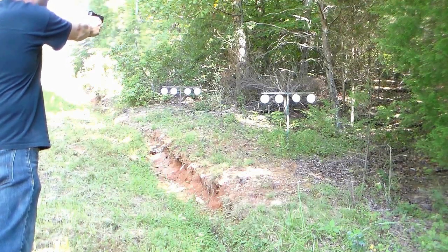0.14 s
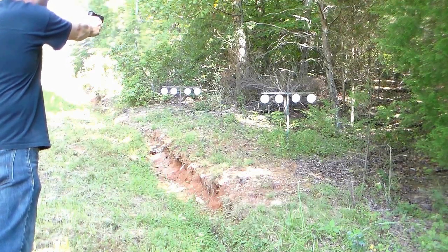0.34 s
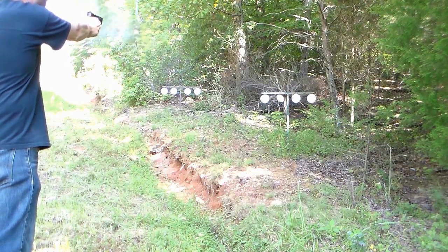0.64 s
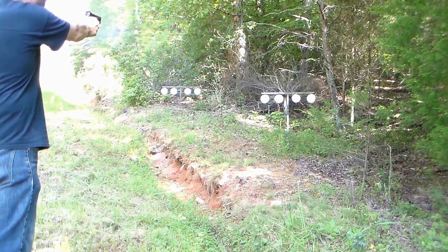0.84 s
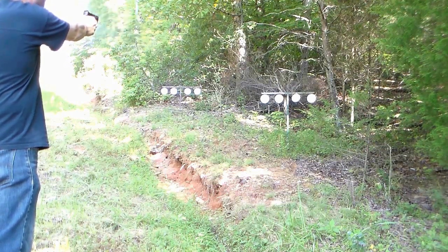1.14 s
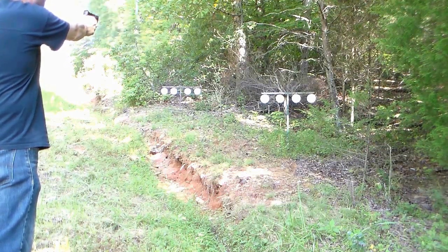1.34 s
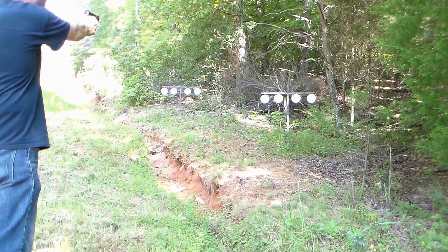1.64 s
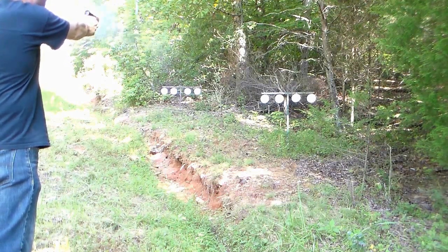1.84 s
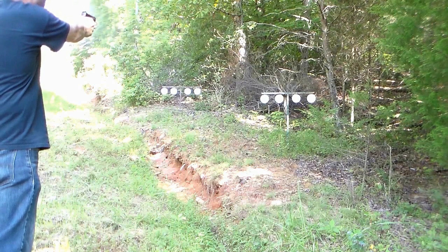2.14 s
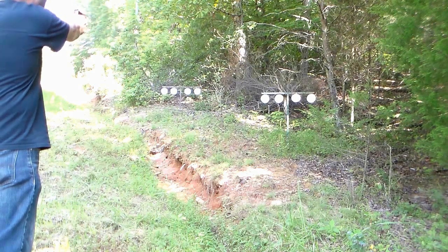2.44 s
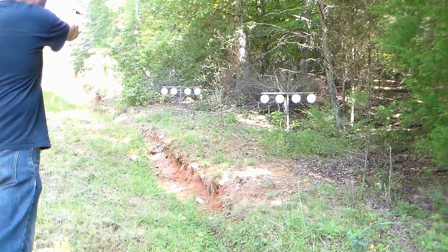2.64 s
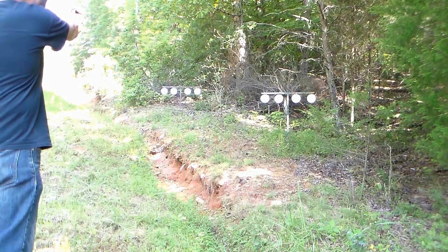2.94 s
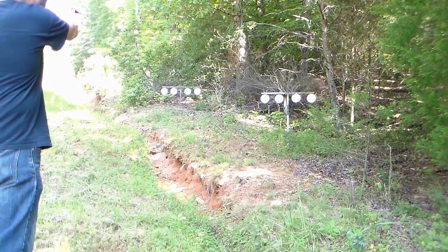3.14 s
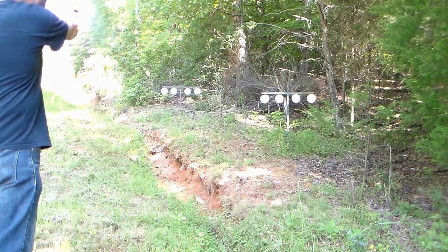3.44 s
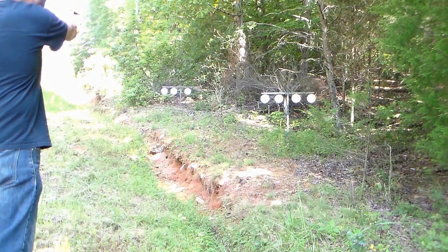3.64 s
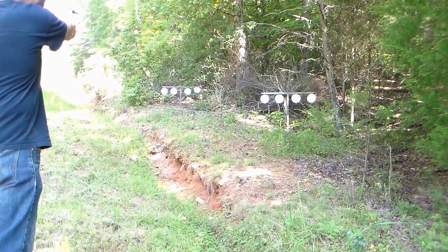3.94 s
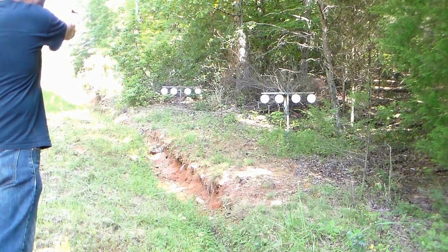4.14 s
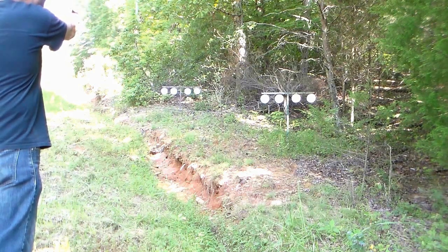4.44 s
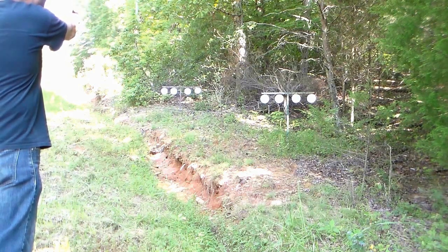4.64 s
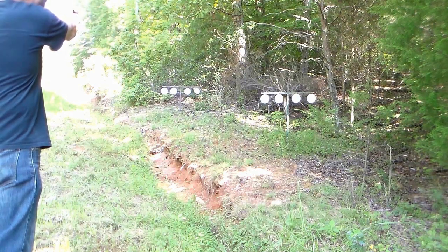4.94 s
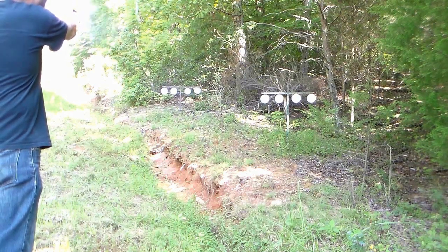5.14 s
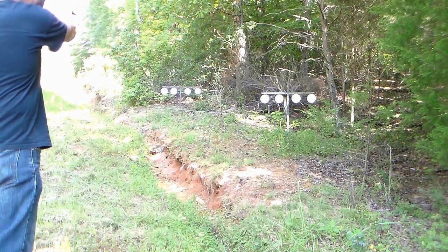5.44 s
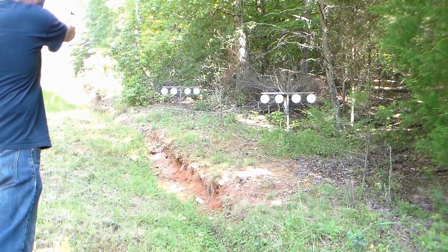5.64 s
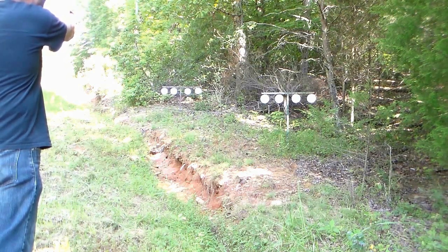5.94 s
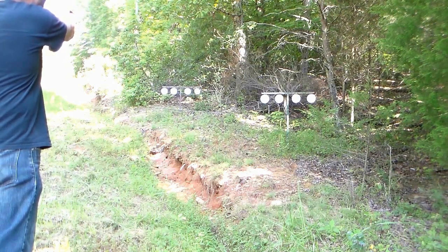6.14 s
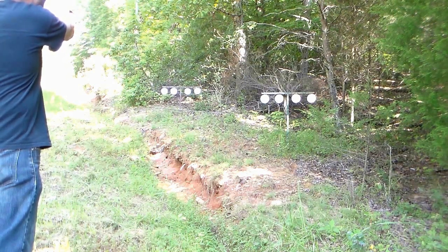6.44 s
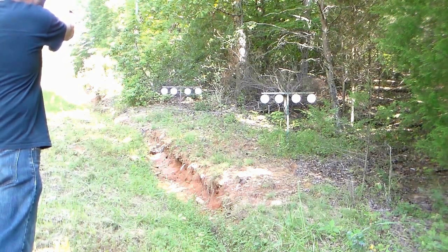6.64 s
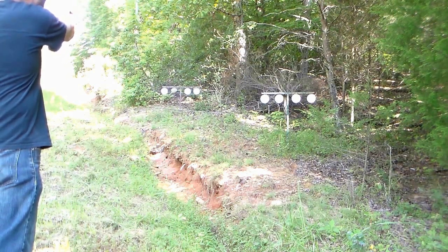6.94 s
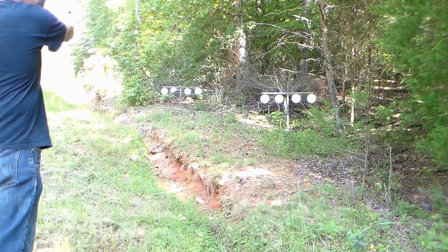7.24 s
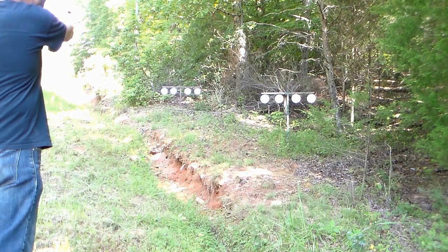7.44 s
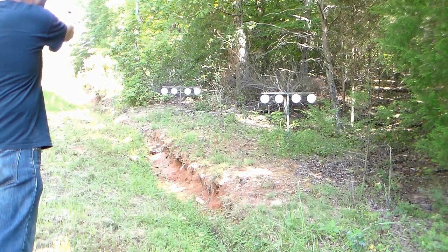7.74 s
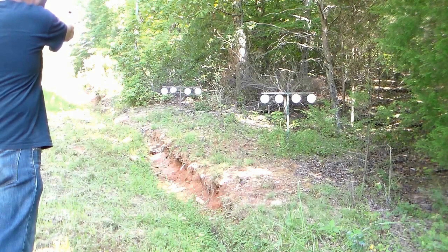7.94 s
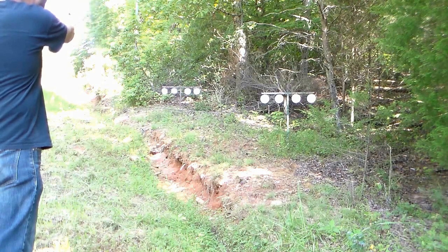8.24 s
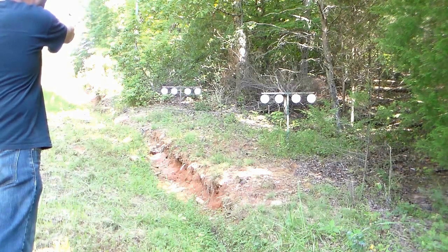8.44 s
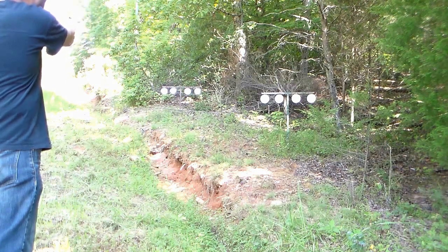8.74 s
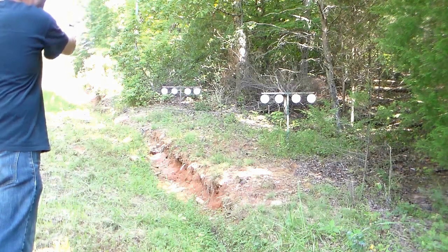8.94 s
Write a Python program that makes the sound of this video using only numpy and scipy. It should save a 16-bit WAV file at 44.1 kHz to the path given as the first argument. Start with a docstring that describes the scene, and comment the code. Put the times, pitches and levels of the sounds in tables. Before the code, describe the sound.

A small pistol fires six times a few steps from the microphone, at a steady pace of about one shot every second and a half. Each loud crack overloads the microphone and echoes off the trees, followed by a sharp metallic snap and the thin ring of a tumbling brass case. Between shots come faint high bird chips, buzzing insects, rustling leaves and light wind.

```python
"""At the edge of a wood, a small pistol is fired again and again a few steps away.
Each blast overloads the microphones and scatters back from ground, trunks and slopes; a sharp metallic
snap follows, the brass case rings as it tumbles, and some cases land in the grass. Behind it are a
distant hush, hissing and buzzing insects, rustling leaves, wind on the microphones and a far bird.
Gain control ducks everything after each shot."""
import sys
import numpy as np
from scipy import signal
from scipy.fft import rfft, irfft, next_fast_len
from scipy.io import wavfile
from scipy.ndimage import uniform_filter1d

SR = 44100
rng = np.random.default_rng(int(sys.argv[2]) if len(sys.argv) > 2 else 0)


def unload_audio(sound):
    """Save the sound as a 16-bit wav file, at the path given as the first command line argument."""
    columns = np.transpose(np.atleast_2d(sound))
    # keep every value between -1 and 1, then stretch to whole-number steps
    steps = np.round(np.clip(columns, -1, 1) * 32767)
    wavfile.write(sys.argv[1], SR, steps.astype(np.int16))


N = 401307
LEAD_SAMPLES = SR // 10  # the mix starts before time zero


def amp(db):
    """Decibels to gain."""
    return 10 ** (np.asarray(db) / 20)


def unit_rms(x):
    """Scales to rms 1."""
    return x / np.sqrt(np.mean(x ** 2) + 1e-20)


def over_frequency(points, hz):
    """Interpolates a table along log frequency."""
    point_hz, value = np.transpose(points)
    return np.interp(np.log(hz + 1), np.log(point_hz + 1), value)


def over_time(points, size):
    """Interpolates a table along the time of the mix."""
    return np.interp((np.arange(size) - LEAD_SAMPLES) / SR, *np.transpose(points))


def add(mix, at_s, sound):
    """Adds a sound to the mix at a time."""
    part = mix[..., round(at_s * SR) + LEAD_SAMPLES:][..., :sound.shape[-1]]
    part += sound[..., :part.shape[-1]]


def wobble(size, cutoff_hz):
    """Low-passed random drift of rms 1."""
    lowpass = signal.butter(2, cutoff_hz, fs=SR, output="sos")
    return unit_rms(signal.sosfilt(lowpass, rng.standard_normal(size)))


# (frequency [Hz], left-right correlation [0..1])
COHERENCE = [(60, 0.19), (180, 0.61), (530, 0.97), (1600, 0.74), (4770, 0.26), (14200, 0.13)]
def stereo_spectra(size):
    """Frequencies and spectra of two noises, most alike in the low mids."""
    hz = np.fft.rfftfreq(size, 1 / SR)
    left, other = rfft(rng.standard_normal((2, size)))
    shared = np.clip(over_frequency(COHERENCE, hz), 0, 1)
    return hz, np.array([left, shared * left + np.sqrt(1 - shared ** 2) * other])


# (frequency [Hz], relative density [dB])
HUSH_SPECTRUM = [(94, -17.5), (160, -7), (257, -10), (726, 1), (798, -4), (2780, -13.5), (3620, -14.5),
                 (5490, -19.5), (7030, -5), (8650, -17.5), (13600, -18), (14700, -11)]
def hush(size, level_db=-43):
    """Distant broad noise with a slow swell."""
    hz, noise = stereo_spectra(size)
    swell_db = .7 * wobble(size, 1.5)
    colour = amp(over_frequency(HUSH_SPECTRUM, hz))
    return amp(level_db + swell_db) * unit_rms(irfft(noise * colour, size))


# (centre [Hz], width [Hz], level [dB], throb cutoff [Hz])
CHORUS_BANDS = [(4500, 59, -73, 5)]
def insect_chorus(size):
    """Many insects hiss in a narrow band that throbs irregularly."""
    hz, noise = stereo_spectra(size)
    out = np.zeros((2, size))
    for centre_hz, width_hz, db, throb_hz in CHORUS_BANDS:
        band = irfft(noise / (1 + (2 * (hz - centre_hz) / width_hz) ** 4), size)
        out += amp(db + 5.4 * wobble(size, throb_hz)) * unit_rms(band)
    return out


# (time [s], level [dB])
RUSTLE_LEVELS = [(0, -66), (.65, -52), (1, -42), (1.7, -69.5), (2, -49), (2.3, -59), (3.2, -62), (4, -62),
                 (5, -89), (6.5, -59), (8, -64), (9.1, -65)]
def leaves(size, low_hz=3690, high_hz=9000):
    """Leaves hiss in the treble as the breeze comes and goes."""
    hz, noise = stereo_spectra(size)
    colour = (1 - 1 / (1 + (hz / low_hz) ** 4)) / (1 + hz / high_hz)
    return amp(over_time(RUSTLE_LEVELS, size)) * unit_rms(irfft(noise * colour, size))


# (time [s], level [dB])
WIND_LEVELS = [(0, -52.5), (2.3, -48.5), (3.95, -49), (5.2, -49), (6.5, -52), (7.3, -48), (8.6, -50),
               (9.1, -48)]
def wind(size):
    """Low lumpy buffeting, partly shared by the two microphones."""
    hz = np.fft.rfftfreq(size, 1 / SR)
    shared, left, right = rfft(rng.standard_normal((3, size)))
    noise = np.array([shared + .46 * left, shared + .48 * right])
    colour = hz / (hz + 3) / (1 + hz / 16) / (1 + (hz / 115) ** 6)
    level_db = over_time(WIND_LEVELS, size) + 1.2 * wobble(size, 3)
    return amp(level_db) * unit_rms(irfft(noise * colour, size))


# (time [s], length [s], level [dB], centre [Hz])
WING_BUZZES = [(3.682, 0.16, -57, 3630), (4.862, .1, -58, 3600), (5.162, 0.18, -54, 3680),
               (5.544, 0.18, -52.5, 3650), (7.317, 0.084, -57, 3600), (8.423, 0.17, -53, 3630)]
def insect_buzzes(size, stroke_hz=50):
    """One insect: a narrow rasp chopped by wing strokes."""
    out = np.zeros((2, size))
    for at_s, length_s, db, hz in WING_BUZZES:
        t = np.arange(round(length_s * SR)) / SR
        band = signal.butter(2, [hz - 220, hz + 220], "band", fs=SR)
        rasp = unit_rms(signal.lfilter(*band, rng.standard_normal((2, len(t)))))
        strokes = 1 + .59 * np.sin(2 * np.pi * stroke_hz * t)
        add(out, at_s, amp(db) * rasp * strokes * np.sqrt(np.sin(np.pi * t / length_s)))
    return out


# (first chip [s], last chip [s], first level [dB], last level [dB], pitch [Hz])
CHIP_RUNS = [(.616, .909, -43, -40, 7040), (1.713, 2.284, -43, -39, 6980), (3.033, 3.178, -46, -41, 7040),
             (4.605, 5.198, -44, -41, 6950), (5.547, 5.69, -42, -38, 6880), (6.48, 6.629, -42, -41, 6900)]
def bird(size, chip_s=.026, spacing_s=.145):
    """Whistled chips that rise a little and fall off, in even runs that grow louder."""
    out, progress = np.zeros(size), np.linspace(0, 1, round(chip_s * SR))
    for first_s, last_s, first_db, last_db, hz in CHIP_RUNS:
        pitch_hz = hz * (1.02 - .26 * (progress - .45) ** 2)
        chip = np.sin(2 * np.pi * np.cumsum(pitch_hz) / SR) * np.sqrt(np.sin(np.pi * progress))
        count = round((last_s - first_s) / spacing_s) + 1
        for at_s, db in np.linspace((first_s, first_db), (last_s, last_db), count):
            add(out, at_s - .004, amp(db) * chip)
    return out * amp([[.6], [-.6]])  # slightly left


# (time [s], level [dB], centre [Hz], decay [s])
CASE_LANDINGS = [(.7845, -29, 3000, .003), (1.995, -47, 12000, .02), (3.098, -29.5, 4300, .003),
                 (6.478, -36, 11000, .003)]
def case_landings(size):
    """A case drops into the grass with a brief dry rustle."""
    out, t = np.zeros(size), np.arange(3000) / SR
    for at_s, db, hz, decay_s in CASE_LANDINGS:
        band = signal.butter(1, [hz / 1.45, hz * 1.45], "band", fs=SR)
        rustle = unit_rms(signal.lfilter(*band, rng.standard_normal(len(t))))
        add(out, at_s, amp(db) * rustle * np.exp(-t / decay_s))
    return out


# (frequency [Hz], t60 [s], relative level [dB])
CASE_MODES = [(3222, .25, 1.5), (4560, .7, 0), (7352, .68, 1.5), (11600, .2, 2), (12330, .14, 2),
              (13450, .14, -7)]
# (time [s], first mode set [dB], second mode set [dB], favoured pitch [Hz], faces listener after [s])
CASE_KNOCKS = [(0, -20.5, -60, 4600, 0), (1.108, -15.5, -33, 6500, 0), (2.412, -23.5, -40, 3700, 0),
               (4.091, -35.5, -33, 5000, .02), (5.786, -52, -30, 5200, .09),
               (7.444, -22.5, -33, 3000, 0.005), (8.706, -23.5, -36, 13500, 0.063)]
def case_ring(size, second_set_hz=(4560, 11600), swing_s=.035, falloff_db_per_octave=8):
    """The knocked brass case flutters as it tumbles, loudest while its mouth faces the listener."""
    out, t = np.zeros(size), np.arange(SR // 2) / SR
    for at_s, first_db, second_db, favoured_hz, faces_s in CASE_KNOCKS:
        facing = .22 + 1.2 * np.exp(-((t - faces_s) / (swing_s + faces_s)) ** 2)
        for hz, t60_s, mode_db in CASE_MODES:
            # the strike point favours one mode set and one pitch
            db = mode_db + (second_db if hz in second_set_hz else first_db)
            db -= falloff_db_per_octave * abs(np.log2(hz / favoured_hz))
            ring = amp(db - 60 * t / t60_s) * np.sin(2 * np.pi * hz * t)
            tumble = 1 + .45 * np.sin(2 * np.pi * (rng.uniform(8, 30) * t + rng.random()))
            add(out, at_s, ring * facing * tumble)
    return out


# (time [s], level [dB], pitch [Hz])
METAL_SNAPS = [(1.1082, -2, 3000), (2.4115, -3, 3400), (4.0915, -8, 9500), (5.7848, -4, 4800),
               (7.4438, -9, 9500), (8.7072, -6, 2600)]
def metal_snaps(size, decay_s=.0008):
    """A sharp metallic snap shortly after each shot: a few cycles of tone inside a burst of noise."""
    out, t = np.zeros((2, size)), np.arange(600) / SR
    for at_s, db, hz in METAL_SNAPS:
        burst = np.sin(2 * np.pi * hz * t) + .55 * rng.standard_normal((2, len(t)))
        add(out, at_s, amp(db) * burst * np.exp(-t / decay_s))
    return out


# (frequency [Hz], level [dB])
SURFACE_TONES = [(615, -24), (920, -20), (1209, -22), (1390, -23), (1526, -24), (1811, -22), (2283, -23),
                 (2547, -24), (3892, -21)]
def surface_ring(size, t60_s=.12):
    """The nearest surfaces answer each blast with the same damped tones."""
    out, t = np.zeros(size), np.arange(SR // 4) / SR
    fade_db = 60 * t / t60_s
    ring = sum(amp(db - fade_db) * np.sin(2 * np.pi * (hz * t + rng.random()))
               for hz, db in SURFACE_TONES)
    for at_s, charge_db, *_ in GUNSHOTS:
        add(out, at_s + .003, amp(charge_db) * ring)
    return out


# (band [Hz], ground [dB], near trees [dB], near t60 [s], far slopes [dB], far t60 [s])
SCATTER_BANDS = [(89.8, -24, -31.5, 0.22, -55, 1.7), (171, -29.5, -35.5, 0.18, -65.5, 0.95),
                 (365, -27, -28, 0.41, -46, 1.7), (623, -15, -23.5, 0.64, -43.5, 2.64),
                 (1230, -11, -15.5, 0.56, -41.5, 3.23), (2137, -32, -16, 0.6, -43, 2.32),
                 (3600, -8.5, -16, 0.57, -40, 1.93), (6060, -28.5, -16.5, 0.56, -51.5, 0.88),
                 (9440, -37.5, -20, 0.5, -54.5, 2.4), (13500, -24.5, -15, 0.41, -59.5, 1)]
def wood_scatter(size, ground_t60_s=.11):
    """Blast returns: the ground dies at once, near trunks fast and lumpily, far slopes linger."""
    hz, noise = stereo_spectra(size)
    shot_power = np.zeros(size)
    for at_s, charge_db, *_ in GUNSHOTS:
        add(shot_power, at_s + .0016, amp([charge_db]) ** 2)

    def tail_power(db, t60_s):
        return amp(db) ** 2 * signal.lfilter([1], [1, -amp(-120 / (t60_s * SR))], shot_power)

    lumps = amp(2.1 * wobble(size, 150))  # single trunks stand out
    log_centres = np.log([row[0] for row in SCATTER_BANDS])
    bass_cut = np.clip(hz / 60, 0, 1) ** 2
    out = np.zeros((2, size))
    for k, (_, ground_db, near_db, near_t60_s, far_db, far_t60_s) in enumerate(SCATTER_BANDS):
        share = np.interp(np.log(hz + 1), log_centres, np.arange(len(log_centres)) == k)
        band = unit_rms(irfft(noise * np.sqrt(share * bass_cut), size))
        close_power = tail_power(ground_db, ground_t60_s) + tail_power(near_db, near_t60_s)
        out += band * np.sqrt(close_power * lumps + tail_power(far_db, far_t60_s))
    return out


def microphone_push(size, settle_per_s=15.8, rise_s=.0018):
    """The pressure step throws the microphones off centre; three coupling stages swing them back."""
    out, t = np.zeros((2, size)), np.arange(SR) / SR
    age = settle_per_s * t
    swing = -(1 - 2 * age + age ** 2 / 2) * np.exp(-age) * (1 - np.exp(-t / rise_s))
    for at_s, _, left_db, right_db in GUNSHOTS:
        add(out, at_s, amp([[left_db], [right_db]]) * swing)
    return out


# off ground and shooter: (delay [s], relative level [dB])
REFLECTIONS = [(.0025, -20), (.0036, -16.5), (.0049, -24.5), (.0062, -22), (.009, -28)]
# (time [s], charge [dB], microphone push left [dB], microphone push right [dB])
GUNSHOTS = [(-.075, -1, -24, -52), (1.0619, -0.5, -11.5, -16), (2.3639, -0.5, -1.5, -3.5),
            (4.0178, -1.5, -0.5, -3), (5.7127, -1.5, -6.5, -12), (7.3676, -2, 0, -3),
            (8.6365, -1, -6, -9.5)]
def blasts(size, gain_db=19, overpressure_s=.0006):
    """A sharp overpressure, a longer suction, then early reflections, all torn by turbulence."""
    out, age = np.zeros((2, size)), np.arange(400) / SR / overpressure_s
    stereo_mix = np.array([[1, .4], [1, -.7]])
    for at_s, charge_db, *_ in GUNSHOTS:
        for delay_s, path_db in [(0, .0055)] + REFLECTIONS:  # direct path first
            turbulence = .87 * np.exp(-age / 1.46) * (stereo_mix @ rng.standard_normal((2, len(age))))
            pulse = (1 - age + turbulence) * np.exp(-age)
            add(out, at_s + delay_s, amp(charge_db + path_db + gain_db) * pulse)
    return out


DUCK_DB = 17
def scene():
    """The pistol, raised by the depth of the ducking, over the quiet life of the wood."""
    size = next_fast_len(N + LEAD_SAMPLES)
    gun = blasts(size) + microphone_push(size) + wood_scatter(size) + surface_ring(size)
    gun += metal_snaps(size) + case_ring(size)
    foreground = amp(DUCK_DB) * gun + case_landings(size)
    background = bird(size) + insect_buzzes(size) + hush(size) + insect_chorus(size)
    return foreground + background + leaves(size) + wind(size)


def record(dry, threshold_db=-2, hold_s=.535, release_s=.059, ceiling=.94, cutoff_hz=14250):
    """Gain control ducks at once on loud sound, holds, then lets go; peaks clip; the top is cut."""
    sidechain = signal.sosfilt(signal.butter(1, 200, "high", fs=SR, output="sos"), dry)
    power = uniform_filter1d((sidechain ** 2).mean(0), 800, origin=399)
    loud = 10 * np.log10(abs(power) + 1e-12) > threshold_db
    t = np.arange(dry.shape[1]) / SR
    quiet_for_s = t - np.maximum.accumulate(np.where(loud, t, -9))
    duck_db = DUCK_DB * np.exp(-np.maximum(quiet_for_s - hold_s, 0) / release_s)
    clipped = np.clip(dry / amp(duck_db), -ceiling, ceiling)[:, LEAD_SAMPLES:LEAD_SAMPLES + N]
    lowpass = signal.firwin(511, cutoff_hz, window=("kaiser", 9), fs=SR)
    return signal.oaconvolve(clipped, lowpass[None], "same")


dry = scene()
out = record(dry)
unload_audio(out)
```